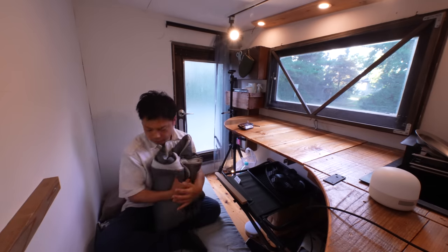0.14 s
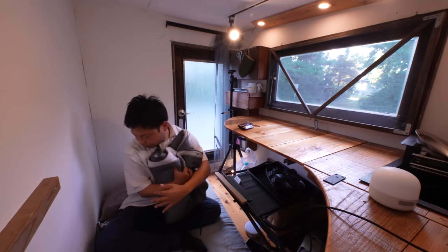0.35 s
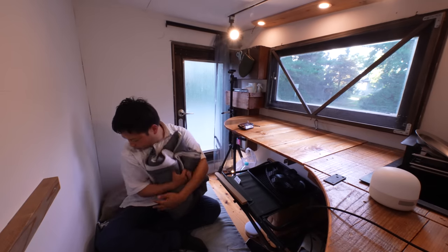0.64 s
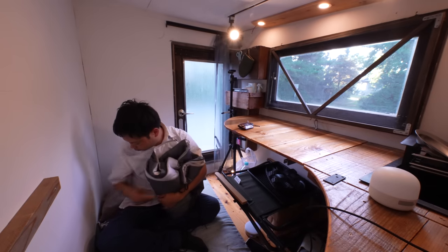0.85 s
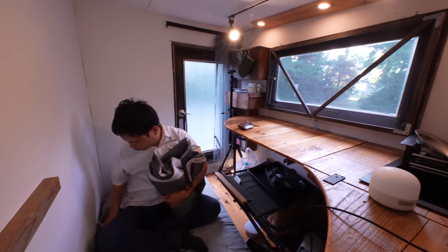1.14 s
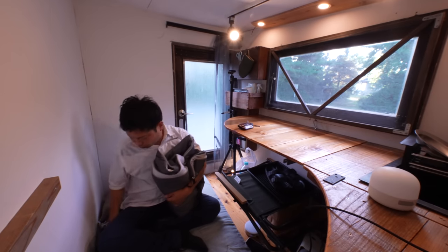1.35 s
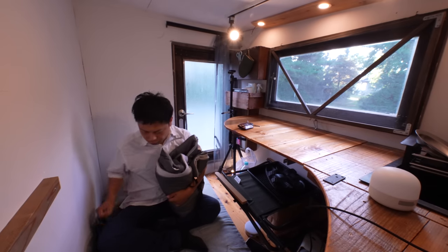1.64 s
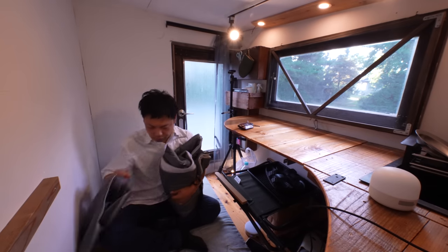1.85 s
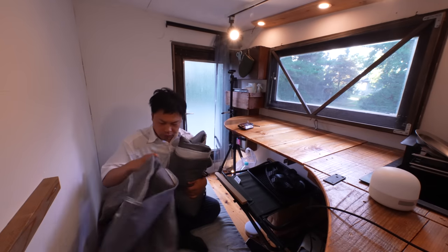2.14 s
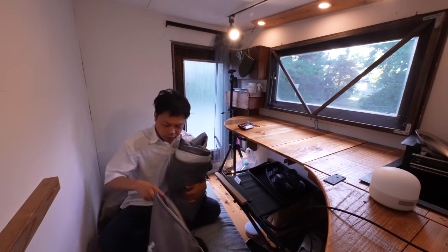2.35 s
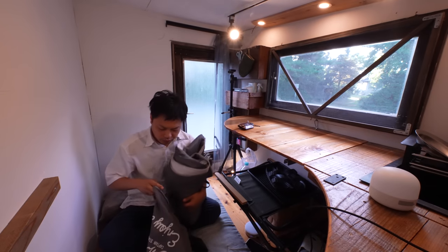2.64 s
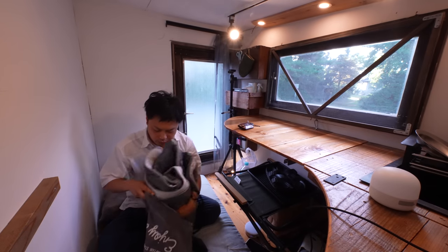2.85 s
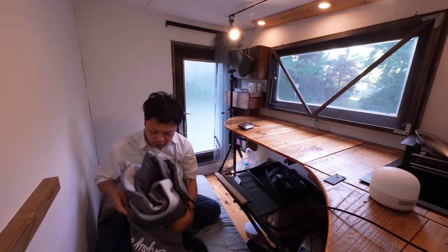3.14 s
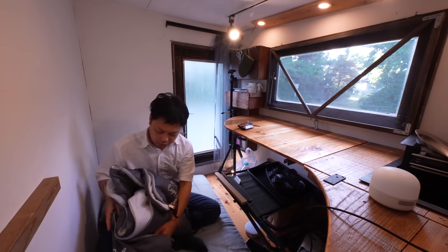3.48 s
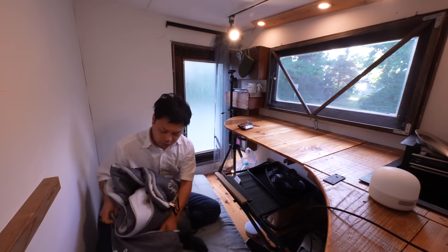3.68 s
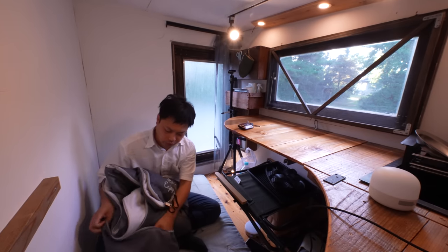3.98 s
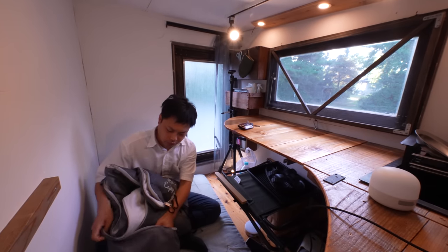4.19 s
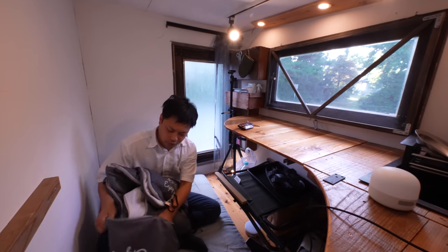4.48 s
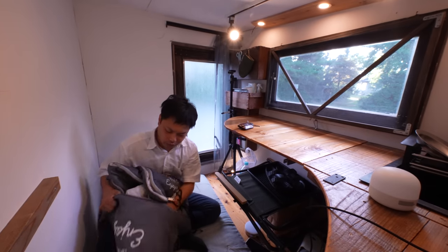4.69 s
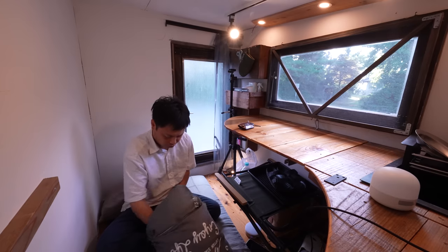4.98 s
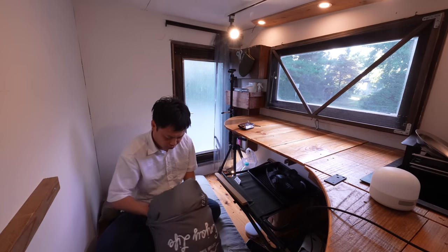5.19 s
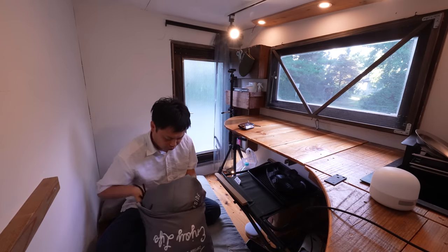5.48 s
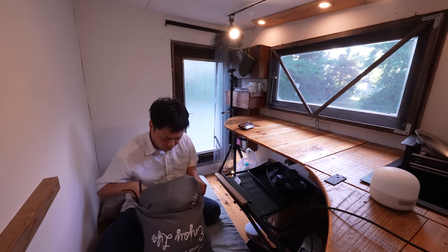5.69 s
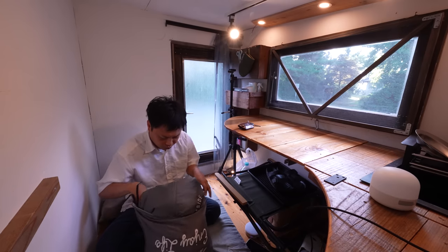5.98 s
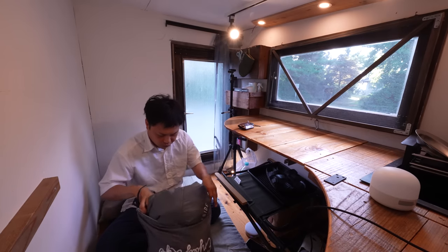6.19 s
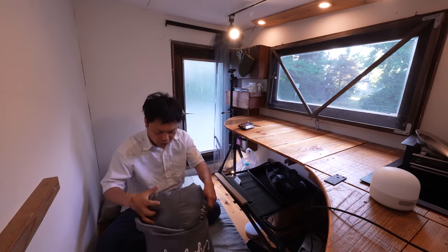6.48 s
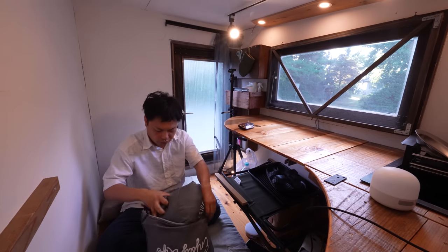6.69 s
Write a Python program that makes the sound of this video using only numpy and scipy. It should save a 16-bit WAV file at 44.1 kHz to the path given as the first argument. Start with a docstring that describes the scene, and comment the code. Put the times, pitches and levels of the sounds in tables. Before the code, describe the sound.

A nylon sleeping bag is handled close by in a small wooden camper. For the first second it swishes and crinkles, its folds flipping with soft, padded pops. The rustle drops away, and at about 1.3 seconds comes a sharp, very quick double knock on the hollow floor with a slight rattle. Around 1.7 seconds a sack is whisked up with a short rasp, a bright hiss and two soft thumps. Uneven rustling follows as the bag is stuffed in, with more fold pops and light clicks from a cord fitting near 2.6 and 3.1 seconds. The fabric goes quieter from about 4 to 4.6 seconds, then swells in firmer pushes with faint rubbing squeaks. Several bright clicks come around 6.4 to 6.6 seconds, and the rustling continues to nearly 7 seconds. Close walls add a brief echo over faint room noise and a low hum.

```python
"""Nylon cloth slides and crinkles as a sleeping bag is pushed into its sack in a small wooden camper.
Friction makes the hiss and the squeaks of the weave; buckling folds pop, and a hard cord fitting clicks.
Early on, a quick double knock excites the modes of the hollow floor, and the sack is whisked up with a
short stick-slip rasp. Close walls add a brief reverberation, over faint room noise and a low hum."""
import sys
import numpy as np
from scipy import signal
from scipy.fft import rfft, irfft, next_fast_len
from scipy.io import wavfile

SR = 44100
rng = np.random.default_rng(int(sys.argv[2]) if len(sys.argv) > 2 else 0)


def wav_record(signal):
    """Record a signal, one row per channel, as 16-bit PCM in the file named by sys.argv[1]."""
    frames = np.transpose(np.atleast_2d(signal))
    bounded = np.clip(frames, -1, 1)
    # unit amplitude maps onto the largest positive 16-bit level
    quanta = np.round(bounded * 32767).astype(np.int16)
    wavfile.write(sys.argv[1], SR, quanta)


N = 301203
TIME = np.arange(N) / SR


def cloth(slide_db=-0.5, sheen_db=1, crinkle_db=-3, flutter_db=1.16, grip_db=0.82, split_hz=5400):
    """Sliding friction: threads slip in a dense hiss, creases snap within it, padding crumples dully."""
    # spectrum of rubbing nylon: frequency_hz, density_db
    nylon_spectrum = [(260, -40.5), (450, -6), (485, -7.5), (623, 1.5), (790, -6.5), (1210, -2), (1370, -8),
                      (1780, -1), (3800, -2.5), (4090, 1), (5340, -12), (7960, -8.5), (9790, -11.5),
                      (12200, -7), (15500, -10.5)]
    # spectrum of crumpling padding: frequency_hz, density_db
    padding_spectrum = [(50, -41), (100, -25.5), (175, -1), (240, -7), (330, -1.5), (470, -16.5),
                        (630, -21.5), (1100, -6), (1600, -27.5), (4000, -25.5)]
    slide, sheen, crumple = strokes() * amp(grip_db * slow(14))
    slips = rng.standard_normal(N) * amp(flutter_db * slow(42))
    creases = cabin(grains(per_s=1000, spread_db=3.5) * amp(2.2 * slow(25)), wet_db=0)
    hiss = colour(slips + amp(crinkle_db) * unit(creases), nylon_spectrum)
    hiss = shift_colour(hiss)
    low, high = (unit(butterworth(hiss, 4, split_hz, kind)) for kind in ("low", "high"))
    lumps = cabin(grains(per_s=450, spread_db=3.2), wet_db=1)
    padding = unit(colour(lumps, padding_spectrum))
    return amp(slide_db) * slide * low + amp(sheen_db) * sheen * high + crumple * padding


def strokes(roundness=1.36, hop=32):
    """Incoherent sources add in power: overlapping strokes give envelopes of hiss, sheen and padding."""
    # cloth drawn over cloth; sheen is the treble of taut nylon:
    # fastest_s, rise_s, fall_s, hiss_db, sheen_re_hiss_db, padding_re_hiss_db
    sweeps = [(0.0, .05, 0.089, -50.5, -5, 2), (0.19, 0.13, 0.22, -58, -1, 1.5),
              (0.39, 0.22, 0.15, -48, -3, -3.5), (0.73, 0.14, 0.052, -54, -3, -2.5),
              (0.835, 0.092, 0.053, -44.5, 0, 0.5), (1.025, 0.12, 0.038, -55, -3.5, -16),
              (1.555, 0.041, 0.046, -54, -26, -6), (1.646, 0.036, 0.061, -57, 14, -1),
              (1.745, 0.078, 0.17, -51, 13.5, -1), (1.865, 0.1, 0.053, -49, 8, -11),
              (1.98, 0.14, 0.14, -56, -3, -4), (2.135, 0.11, 0.096, -54, -5, 1),
              (2.58, 0.15, 0.14, -51, -10, -5), (2.8, 0.11, .28, -52.5, -6.5, -2.5),
              (3.38, 0.27, 0.17, -54, -9, -6), (3.79, 0.13, 0.22, -57.5, -5.5, -8.5),
              (3.91, 0.097, 0.055, -61, 1.5, -19), (4.28, 0.55, 0.45, -74.5, 6.5, 0),
              (4.7, 0.13, 0.15, -53.5, 0, -12), (4.829, 0.07, 0.072, -45.5, 3.5, -3),
              (4.97, 0.057, 0.058, -55.5, -1, 4), (5.12, 0.13, 0.19, -51.5, 0.5, 1.5),
              (5.48, 0.29, 0.25, -50.5, -0.5, -2.5), (5.73, 0.024, 0.16, -54, 0, -15),
              (6.09, 0.11, 0.14, -57.5, -2.5, -10), (6.42, 0.21, .1, -52, -4, -9),
              (6.635, 0.15, 0.23, -48.5, -4, -7), (6.83, 0.065, .05, -51.5, -4, -17)]
    # the held bundle never quite rests: hiss_db, sheen_db, padding_db
    held_db = [-72, -72.5, -71.5]
    t = TIME[::hop]
    power = amp(held_db)[:, None] ** 2 * np.ones(len(t))
    for s, rise, fall, db, sheen_db, padding_db in sweeps:
        speed = np.exp(-(abs(t - s) / np.where(t < s, rise, fall)) ** roundness)
        power += (amp([db, db + sheen_db, db + padding_db])[:, None] * speed) ** 2
    return np.array([np.interp(TIME, t, level) for level in np.sqrt(power)])


def shift_colour(x, depth_db=1.03, width_hz=200, lasts_s=0.031):
    """Spectral modulation: as the cloth changes shape, patches of its spectrum swell and fade."""
    hz, frame_s, spectra = signal.stft(x, SR, nperseg=512)
    patches = rng.standard_normal(spectra.shape)
    for axis, span in ((0, width_hz / hz[1]), (1, lasts_s / frame_s[1])):
        bell = np.exp(-(np.arange(-24, 25) / span) ** 2)
        patches = signal.fftconvolve(patches, np.expand_dims(bell, 1 - axis), "same")
    return signal.istft(spectra * amp(depth_db * unit(patches)), SR, nperseg=512)[1][:N]


def folds(thump_gain_db=-1, edge_gain_db=-5, decay_cycles=0.41, flop_s=0.014, flop_db=-11.5):
    """Snap-through buckling: a fold pushes air in a damped swing, snaps taut and creases at its edge."""
    # folds that flip over: start_s, thump_db, thump_hz, snap_db, edge_db
    flips = [(0.084, -47, 161, -46.5, -39.5), (0.142, -38, 192, -41.5, -41), (0.159, -29.5, 264, -51, -59),
             (0.195, -38, 128, -64, -56), (0.246, -27.5, 335, -40, -47), (0.309, -45, 286, -45, -45),
             (0.361, -40.5, 170, -40.5, -50), (0.588, -39.5, 165, -48.5, -52),
             (0.678, -41.5, 163, -47.5, -47), (0.773, -38, 278, -46.5, -55), (1.715, -29.5, 300, -56, -37),
             (1.799, -27, 234, -47, -48), (2.319, -60, 261, -56.5, -53.5), (2.378, -41.5, 263, -47.5, -64),
             (2.406, -32.5, 298, -40, -61), (2.968, -43, 174, -57, -51), (3.248, -34.5, 270, -40, -43),
             (4.904, -33, 179, -53, -56), (5.142, -42, 159, -52, -55), (5.564, -38.5, 173, -62, -62),
             (5.616, -43.5, 173, -69, -47), (6.373, -42.5, 168, -38, -38.5)]
    # spectrum of the papery snap: frequency_hz, density_db
    snap_spectrum = [(150, -18), (400, -1), (640, 3.5), (1100, -1.5), (1600, -14), (4000, -17.5),
                     (9000, -41)]
    # spectrum of the crisp edge: frequency_hz, density_db
    edge_spectrum = [(700, -9.5), (1300, -18), (2100, 4.5), (4200, -5), (5200, -17), (12000, -19)]
    out, t = np.zeros(N), np.arange(SR // 12) / SR
    for s, thump_db, hz, snap_db, edge_db in flips:
        age = hz * t / decay_cycles
        swing = amp(thump_db + thump_gain_db) * age * np.exp(1 - age) * np.sin(2 * np.pi * hz * t)
        snap = amp(snap_db) * buckle(t, snap_spectrum, settle_s=0.011)
        edge = amp(edge_db + edge_gain_db) * buckle(t, edge_spectrum, settle_s=0.0023)
        add(out, s, swing + snap + edge)
        add(out, s + flop_s, amp(flop_db) * swing)  # the fold falls back once, softer
    return cabin(out, wet_db=-3)


def buckle(t, spectrum, settle_s, jerk_s=0.0017):
    """Transient relaxation: the cloth jerks in a burst of noise that decays as it settles."""
    envelope = t / jerk_s * np.exp(1 - t / jerk_s) + .5 * np.exp(-t / settle_s)
    burst = colour(rng.standard_normal(len(t)) * envelope, spectrum)
    return unit(burst) * np.sqrt(np.mean(envelope ** 2))


def squeaks():
    """Quasi-periodic friction: ribs of the weave tick past in a fuzzy tone that glides with their speed."""
    # weave on weave, broad brush to thin squeak: start_s, length_s, first_hz, last_hz, width_hz, level_db
    rubs = [(0.535, 0.023, 755, 734, 252, -54.5), (0.799, 0.042, 1020, 1040, 400, -52),
            (1.583, 0.083, 11000, 10700, 1300, -50.5), (2.536, 0.11, 745, 780, 350, -57),
            (2.56, .06, 14800, 15400, 900, -53), (3.275, .18, 1020, 950, 500, -58.5),
            (3.509, 0.036, 1630, 1820, 200, -61), (4.6, 0.31, 980, 890, 600, -58.5),
            (5.001, 0.51, 870, 550, 450, -59), (6.44, 0.025, 1950, 1930, 110, -51),
            (6.663, 0.039, 517, 750, 700, -46.5), (6.751, 0.049, 804, 940, 90, -50),
            (6.79, 0.057, 1110, 1290, 200, -55)]
    out = np.zeros(N)
    for s, length_s, first_hz, last_hz, width_hz, db in rubs:
        hz = np.linspace(first_hz, last_hz, int(length_s * SR))
        tone = resonate(resonate(rng.standard_normal(len(hz)), hz, width_hz), hz, width_hz)
        swell = np.sin(np.linspace(0, np.pi, len(hz)))
        add(out, s, amp(db) * unit(tone * swell))
    return cabin(out, wet_db=-7.5)


def whisk(start_s=1.655, attack_s=0.023, hold_s=0.019, fade_db_per_s=750, level_db=-30.5,
          slip_hz=700, jitter=0.45, uneven_db=3):
    """Stick-slip friction: the dragged sack catches and lets go in a quick, uneven train of pulses."""
    # spectrum of the rasp: frequency_hz, density_db
    rasp_spectrum = [(180, -20), (300, -2), (565, -9), (619, -10), (688, -6.5), (908, -14), (1150, 2),
                     (1280, -11), (2110, -5), (3220, -16), (3530, -13.5), (4590, -15), (4900, -37),
                     (7000, -27), (9100, -37), (15400, -120)]
    slip_count = np.cumsum(slip_hz * np.exp(jitter * slow(401))) / SR
    slips = np.diff(np.floor(slip_count), prepend=0) * amp(uneven_db * slow(670))
    rasp = unit(colour(slips - slips.mean(), rasp_spectrum))
    age = TIME - start_s
    fade_db = fade_db_per_s * np.maximum(age - attack_s - hold_s, 0)
    envelope = np.clip(age / attack_s, 0, 1) ** 2 * amp(level_db - fade_db)
    return cabin(-envelope * rasp, wet_db=-5.5)


def clicks(gain_db=-3, crack_s=0.0028, width_hz=5000, reach_octaves=0.7):
    """Impact excitation: the cord fitting cracks brightly, then the modes near that pitch ring on."""
    # taps of the fitting: start_s, level_db, centre_hz, ring_re_crack_db
    taps = [(0.0686, -40.5, 7170, -22), (0.93, -39.5, 11100, -24), (2.59, -34, 15500, -24),
            (3.0578, -25, 15300, -20), (6.358, -33, 7890, -30), (6.3692, -27, 8500, -4),
            (6.386, -33.5, 5000, -11.5), (6.546, -32, 13200, -10), (6.567, -32.5, 10800, -8)]
    # modes of the fitting: pitch_hz, level_db, t60_s
    modes = [(4230, 7, 0.09), (5190, 4, .08), (9680, -3, 0.11), (10020, -5, 0.09), (13750, -3, .16),
             (15300, -7, .09)]
    out, t = np.zeros(N), np.arange(SR // 5) / SR
    for s, db, centre_hz, ring_db in taps:
        crack = unit(resonate(rng.standard_normal(len(t)), centre_hz, width_hz)) * np.exp(-t / crack_s)
        ring = np.zeros(len(t))
        for hz, mode_db, t60 in modes:
            nearness = np.exp(-(np.log2(hz / centre_hz) / reach_octaves) ** 2)
            ring += nearness * amp(mode_db - 60 * t / t60) * np.sin(2 * np.pi * (hz * t + rng.random()))
        add(out, s, amp(db + gain_db) * (crack + amp(ring_db) * ring))
    return cabin(butterworth(out, 3, 3000, "high"), wet_db=0.59)


def knocks(ring_db=-3, thud_db=-2, thud_hz=330, thud_s=0.0049, rattle_s=0.0072, cutoff_hz=70):
    """Modal response: half-sine force pulses dent the floor, ring its boards and rattle what lies there."""
    # blows on the floor, in two close pairs: start_s, push_db, contact_s, rattle_db
    blows = [(1.3019, -11, 0.001, -31.5), (1.3090, -19.5, 0.0018, -47), (1.3304, -20, 0.00069, -32.5),
             (1.3373, -19, 0.0027, -28)]
    # modes of the floorboards: pitch_hz, level_db, t60_s
    modes = [(78, -7, 0.24), (102.2, -14.5, 0.24), (191, 4, 0.12), (227, -1, 0.079), (276, -4.5, 0.1),
             (331, 3.5, 0.12), (415, -2, 0.051), (513, -6, 0.078), (610, -2.5, 0.036), (786, -5.5, 0.04),
             (1250, -10, 0.076)]
    # spectrum of loose things on the floor: frequency_hz, density_db
    rattle_spectrum = [(40, -22), (150, 7), (600, 12), (1250, -0.5), (1600, -2), (2900, 1), (3400, -5.5),
                       (4250, 8), (5000, -9), (6100, -5), (9000, -10.5), (15500, -23)]
    t = np.arange(SR // 2) / SR
    boards = sum((-1) ** k * amp(db - 60 * t / t60) * np.sin(2 * np.pi * hz * t)
                 for k, (hz, db, t60) in enumerate(modes))
    thud = np.sin(2 * np.pi * thud_hz * t) * np.exp(-t / thud_s)
    floor = amp(ring_db) * boards + amp(thud_db) * thud
    body, rattle = np.zeros(N), np.zeros(N)
    for s, db, contact_s, rattle_db in blows:
        push = np.sin(np.pi * np.minimum(t / contact_s, 1))
        add(body, s, amp(db) * signal.fftconvolve(floor, push / push.sum())[:len(t)])
        add(rattle, s, amp(rattle_db) * rng.standard_normal(len(t)) * np.exp(-t / rattle_s))
    body = butterworth(body, 3, cutoff_hz, "high")  # a small panel radiates no deep bass
    return cabin(body, wet_db=-12.5) + cabin(colour(rattle, rattle_spectrum), wet_db=-2.2)


def cabin(x, wet_db, tail_count=3, crossfades_per_s=2.3):
    """Reverberation: a dense, short echo of close walls; several tails crossfade to keep its colour even."""
    # decay of the cabin: frequency_hz, t60_s
    decay_times = [(100, 0.43), (300, 0.16), (800, 0.14), (2000, 0.19), (4500, 0.14), (13000, 0.14)]
    t = np.arange(SR // 3) / SR
    reflections = rng.standard_normal((tail_count, len(t))) * np.clip((t - .003) / 0.002, 0, 1)
    hz, frame_s, spectra = signal.stft(reflections, SR, nperseg=256)
    decay = amp(-60 * frame_s / read(decay_times, hz)[:, None])
    tails = signal.istft(spectra * decay, SR, nperseg=256)[1]
    echo = np.zeros(N)
    for k, tail in enumerate(tails):
        offset = abs((TIME * crossfades_per_s * tail_count + k) % tail_count - tail_count / 2)
        crossfade = np.cos(np.pi / 2 * np.minimum(offset, 1))
        echo += signal.oaconvolve(x * crossfade, tail / np.linalg.norm(tail))[:N]
    return x + amp(wet_db) * echo


def background(air_db=-58.5, hum_db=-60.5, hum_hz=68.8, width_hz=12):
    """Ambient noise: broadband still air in the camper, and a narrow band heard as an unsteady hum."""
    # spectrum of the quiet cabin: frequency_hz, density_db
    air_spectrum = [(15, -5), (25, -20.5), (53, -1), (79, 1), (193, -13.5), (240, -13), (331, -13),
                    (445, -21), (631, -20.5), (1240, -28.5), (1660, -34.5), (4150, -28.5), (4750, -34),
                    (7300, -33), (15500, -50)]
    hum = resonate(resonate(rng.standard_normal(N), hum_hz, width_hz), hum_hz, width_hz)
    air = colour(rng.standard_normal(N), air_spectrum)
    return amp(air_db) * unit(air) + amp(hum_db) * unit(hum)


def grains(per_s, spread_db):
    """Shot noise: random impulses, many small and a few large."""
    size = amp(spread_db * np.minimum(rng.exponential(1, N), 4))
    return unit(size * rng.choice([-1, 1], N) * (rng.random(N) < per_s / SR))


def slow(rate_hz):
    """Low-passed noise of rms 1, fluctuating up to about the given rate."""
    size = next_fast_len(N, True)
    rolloff = 1 + (np.fft.rfftfreq(size, 1 / SR) / rate_hz) ** 4
    return unit(irfft(rfft(rng.standard_normal(N), size) / rolloff, size)[:N])


def resonate(x, hz, width_hz):
    """A resonance of gain 1 whose centre may glide."""
    carrier = np.exp(2j * np.pi * np.cumsum(hz * np.ones(len(x))) / SR)
    pole = np.exp(-np.pi * width_hz / SR)
    return 2 * (carrier * signal.lfilter([1 - pole], [1, -pole], x / carrier)).real


def colour(x, spectrum, size=4096):
    """Minimum-phase filter of unit energy: only the shape of the spectrum counts."""
    hz = abs(np.fft.fftfreq(size, 1 / SR))
    log_gain = np.log(amp(np.maximum(read(spectrum, hz), -100)))
    taps = np.fft.ifft(np.exp(np.conj(signal.hilbert(log_gain)))).real[:size // 2]
    return signal.oaconvolve(x, taps / np.linalg.norm(taps))[:len(x)]


def butterworth(x, order, cutoff_hz, kind):
    """Maximally flat low-pass or high-pass filter."""
    return signal.sosfilt(signal.butter(order, cutoff_hz, kind, fs=SR, output="sos"), x)


def read(points, hz):
    """Interpolation on a log-frequency axis."""
    point_hz, value = np.transpose(points)
    return np.interp(np.log(hz + 1), np.log(point_hz + 1), value)


def add(mix, s, sound):
    """Superposes a sound at s seconds."""
    part = mix[max(round(s * SR), 0):][:len(sound)]
    part += sound[:len(part)]


def amp(db):
    """Decibels to amplitude ratio."""
    return 10 ** (np.asarray(db) / 20)


def unit(x):
    """Normalises to rms 1."""
    return x / np.sqrt(np.mean(x ** 2) + 1e-20)


def scene():
    """Superposition: the pressures of all sources add at one point."""
    return (cloth() + folds() + clicks() + knocks() + whisk() + squeaks() + background())[None]


def record(dry, limit_hz=16000):
    """Resonances of the microphone port colour the sound, and a low-pass limits its band."""
    # response of the port: frequency_hz, gain_db
    port_response = [(3500, 0.5), (4250, 0), (4550, 0), (4850, -5), (5600, -0.5), (7000, 0), (8600, 3.5),
                     (9200, -0.5), (10500, -0.5)]
    heard = colour(dry[0], port_response)
    lowpass = signal.firwin(511, limit_hz, window=("kaiser", 9), fs=SR)
    return signal.oaconvolve(heard, lowpass, "same")[None]


dry = scene()
out = record(dry)
wav_record(out)
```